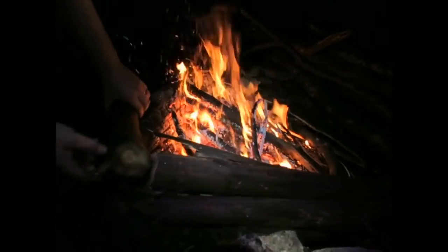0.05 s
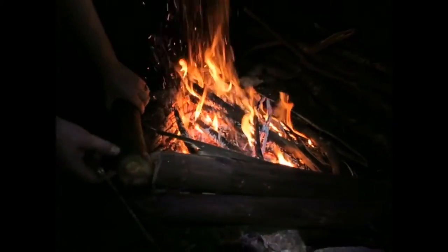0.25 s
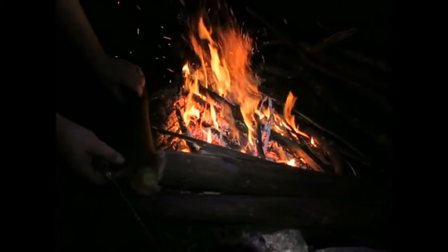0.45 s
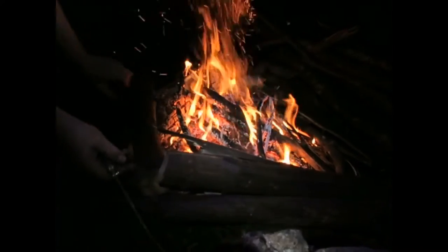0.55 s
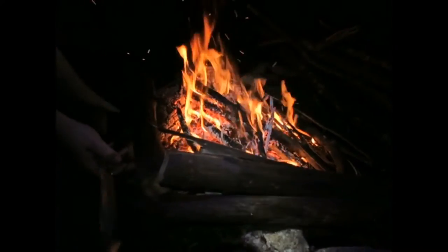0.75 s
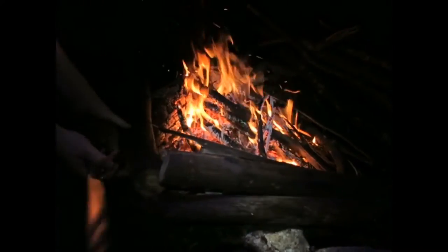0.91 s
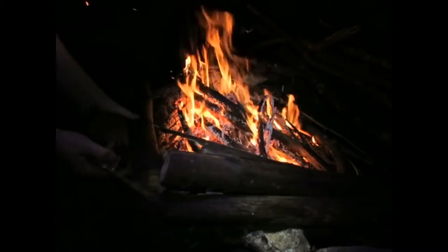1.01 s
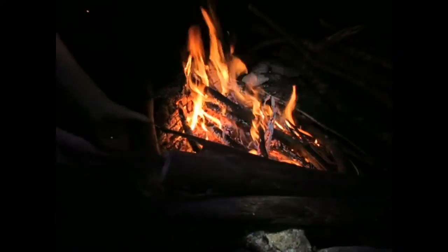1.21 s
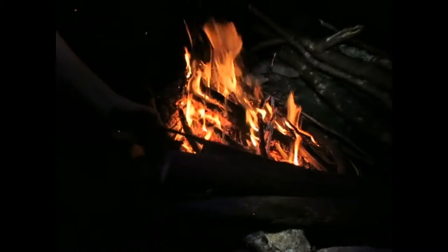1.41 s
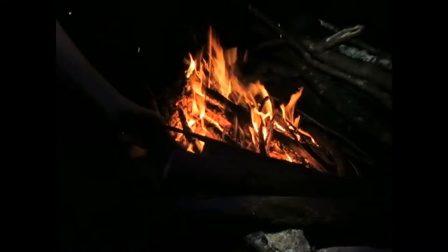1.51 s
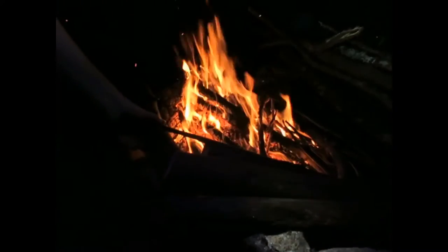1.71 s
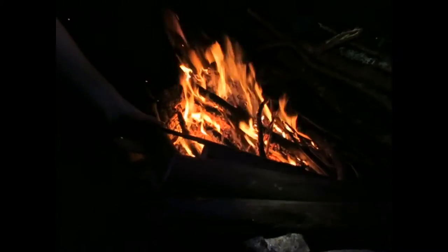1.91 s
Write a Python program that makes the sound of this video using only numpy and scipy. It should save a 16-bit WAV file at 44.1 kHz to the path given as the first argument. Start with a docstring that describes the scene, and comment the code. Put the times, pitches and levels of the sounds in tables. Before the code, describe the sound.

A wood fire crackles close by outdoors, about two seconds. Low flames flutter under sputtering sap hiss and fine ember fizz. Sharp snaps at 0.02 and 0.12, a hollow log knock at 0.2, then an overloaded, thumping crack at 0.4. Bright snaps follow at 0.63 and 0.74, faint ticks around 1.0, a pop at 1.25, and wood thuds dully on the ground at 1.65 as the flutter swells.

```python
"""Wood fire, close microphone

A wood fire outdoors at night: filtered noise makes the low flutter of the flames, the swelling hiss of
sap and the fizz of embers under fine crackle. Close by, the fire snaps in bursts of coloured noise with
a scattered answer. Ringing modes make knocks on a hollow log and low thuds: the thump of the loudest
snap and wood landing on the ground.
"""
import sys
import numpy as np
from scipy import signal
from scipy.fft import rfft, irfft, next_fast_len
from scipy.io import wavfile
from scipy.ndimage import uniform_filter1d, map_coordinates

SR = 44100
rng = np.random.default_rng(int(sys.argv[2]) if len(sys.argv) > 2 else 0)


def dump(signal):
    """Clip the signal to [-1, 1] and save it as 16-bit WAV at the path in sys.argv[1]."""
    limited = np.clip(np.atleast_2d(signal).T, -1, 1)
    pcm = np.round(limited * 32767).astype(np.int16)
    wavfile.write(sys.argv[1], SR, pcm)


N = 85995

# Levels of the three steady sounds: (time [s], sap hiss [dB], flame flutter [dB], ember fizz [dB])
BED_LEVELS = [(0, -48.5, -37.5, -46), (.14, -44, -45.5, -49.5), (.27, -49, -43, -54),
              (0.358, -66.5, -49.5, -51.5), (.5, -48.5, -47, -55), (.56, -47, -44.5, -56),
              (.86, -48.5, -47, -57), (.95, -56, -48.5, -59), (1.09, -72.5, -49.5, -60),
              (1.22, -48.5, -47, -55), (1.45, -52, -42.5, -54), (1.58, -53, -40.5, -54),
              (1.72, -61, -44.5, -56), (1.95, -52.5, -41.5, -59)]
# Spectrum of the flame flutter: (frequency [Hz], relative density [dB per Hz])
FLAME_SPECTRUM = [(20, -8.5), (55, -0.5), (130, 0), (220, -6), (450, -14), (900, -21.5), (2500, -43)]
# Resonances of the narrow sap vents: (frequency [Hz], width [Hz], level [dB])
SAP_VENTS = [(980, 118, -5.5), (1510, 136, 0.95), (1903, 130, -1.5), (2860, 980, -13.5)]
# Spectrum of the ember fizz: (frequency [Hz], relative density [dB per Hz])
FIZZ_SPECTRUM = [(300, -1.5), (700, -7), (3000, -7.5), (7000, -15.5), (12300, -17.5), (13200, -15.5),
                 (16000, -49)]
# Stereo likeness of the steady sounds: (frequency [Hz], left-right correlation [0 to 1])
STEREO_LIKENESS = [(100, 1), (450, 0.23), (800, 0.42), (1800, 0.93), (5000, 0.62), (12000, 0.2)]
# Snaps of the fire, some with a quick ground echo, and the clack that starts a thud:
# (time [s], peak level [dB], pitch [Hz], bass [dB], treble [dB], width [share of pitch])
SNAP_EVENTS = [(0.0188, -11.5, 3360, -13, -4, 0.83), (0.0298, -29, 5000, -18, -5, .9),
               (0.1184, -11.5, 3300, -2.5, -10.5, 5.1), (.169, -33, 5340, -16, -25, 0.38),
               (0.199, -28.5, 5000, -22, -33, 0.65), (0.3279, -17.5, 3980, -20, 1.5, 3.3),
               (.3959, 8, 2050, -9, -22, .8), (.3972, -4, 3100, -12, -30, 0.3),
               (0.3981, 5, 2250, -14, -30, 0.5), (0.5307, -29, 3320, -2, -25, 0.37),
               (0.6305, -9, 4940, -14.5, 3.5, 1.02), (0.7411, -12, 2900, -8, -30, 0.7),
               (0.7427, -1.5, 4500, -21, -40, .55), (.7444, -15, 4500, -18, -40, .5),
               (0.9526, -33.5, 4360, -50, -24, 0.71), (1.0152, -29, 8000, -26.5, 0.5, .8),
               (1.0306, -20, 3700, -9.5, -27, 2.8), (1.056, -33.5, 7240, -33.5, -1, 0.15),
               (1.0958, -28.5, 6000, -27, 11, 0.82), (1.1623, -33, 6970, -25, 16, 1),
               (1.176, -35, 7000, -20, -5, 0.99), (1.2465, -12, 3150, -11.5, -7.5, 0.87),
               (1.2495, -22, 6000, -20, 0, 1.4), (1.3493, -24, 2700, -8, -22, 0.4),
               (1.3519, -31, 1700, -12, -25, .35), (1.3587, -21.5, 4080, -5, -3, 1.5),
               (1.375, -31.5, 8100, -32, 10, 0.71), (1.4505, -31, 4930, -28, -16, 0.56),
               (1.5381, -29, 6000, -22, -14, 0.78), (1.606, -37.5, 4240, -28, -14, 0.63),
               (1.647, -21, 1200, -6, -45, 1.5), (1.679, -17.5, 3300, -9.5, -9.5, 0.69),
               (1.7931, -24, 4080, -35.5, -11, 2), (1.803, -30.5, 2970, -13, -16, 0.32)]
# Blows on the hollow log: (time [s], level [dB], ring [share of the modes' t60])
LOG_KNOCKS = [(.1985, -20.5, 1.11), (.2043, -24, 1.02), (.553, -36.5, 0.76), (.561, -40.5, 0.65)]
# Modes of the hollow log: (frequency [Hz], level [dB], t60 at ring share 1 [s])
LOG_MODES = [(285.8, -1.7, 0.17), (299.3, -9.5, 0.14), (443, 0.3, 0.085), (595, -3.5, 0.084),
             (745, -5.5, 0.051), (1035, -12, 0.062)]
# Low thuds, the thump of the loudest snap and wood landing on the ground:
# (time [s], level [dB], ring [share of the modes' t60])
LOW_THUDS = [(.3963, -19, .25), (1.6478, -26, 1), (1.6605, -33, 1)]
# Modes shared by the low thuds: (frequency [Hz], level [dB], t60 at ring share 1 [s])
THUD_MODES = [(61, -15, 0.13), (101, 2.5, 0.052), (148.3, 5.5, 0.057), (242.6, -3.5, 0.14),
              (329, -1.5, 0.084), (457.4, -7.5, 0.1), (763, -7.5, 0.09), (1042, -5, 0.075),
              (1220, -24, 0.043)]
# Response of the microphone: (frequency [Hz], gain [dB])
MIC_RESPONSE = [(25, -6), (60, 0), (9000, -0.5), (16300, -7.5)]

CRACKLE_PER_S, CRACKLE_DB = 700, -8.5  # level relative to the ember hiss
CRACKLE_HZ, CRACKLE_CYCLES = 6000, 3.58  # middle pitch; cycles until a tick falls to 1/e
CRACKLE_SPREAD_DB = 3.5  # mean of the exponential spread of tick levels
SPLINTER_DB, SPLINTER_T60_S, TREBLE_T60_S = -20, 0.014, 0.011  # tearing after the burst
SCATTER_DB, SCATTER_T60_S, SCATTER_WAIT_S = -41.5, 0.08, 0.0011  # answer of logs and ground
BASS_HZ, BASS_Q, TREBLE_HZ, TREBLE_Q = 700, 0.6, 12500, 5  # outer colours of a snap
LEFT_DB, LEFT_LAG_S = -0.06, 14e-6  # the snaps sit a little to the right
GRIT_DB, GRIT_HZ, GRIT_T60_S = 14.5, 700, 0.06  # rough part of a thud; t60 at ring share 1
CLIP_TOP, CLIP_KNEE, TOP_HZ = 1.0, 6, 16300  # full scale, knee exponent, band limit


def amp(db):
    """Decibels to gain."""
    return 10 ** (np.asarray(db) / 20)


def unit(x):
    """Scaled to rms 1."""
    return x / np.sqrt(np.mean(x ** 2) + 1e-20)


def along(points, hz):
    """Value at hz, read between (Hz, value) points on a log axis."""
    f, v = np.transpose(points)
    return np.interp(np.log(hz + 1), np.log(f + 1), v)


def level_curve(column):
    """One column of the steady levels in dB, a value per sample."""
    rows = np.array(BED_LEVELS)
    return np.interp(np.arange(N) / SR, rows[:, 0], rows[:, column])


def wobble(rate):
    """A smooth random curve with rate knots a second (below 100)."""
    knots = rng.standard_normal(int(N * 100 / SR) + 4)
    return map_coordinates(knots, [np.arange(N) * rate / SR])


def filtered(x, response):
    """x times a complex response of frequency, with padding for the tails."""
    n = x.shape[-1]
    m = next_fast_len(n + 4096)
    return irfft(rfft(x, m) * response(np.fft.rfftfreq(m, 1 / SR)), m)[..., :n]


def peak(f, hz, width):
    """One causal resonance with gain 1 at its centre."""
    return 1j * f * width / (hz * hz - f * f + 1j * f * width)


def rush(gain, patchy_db):
    """Stereo noise of rms 1, its gain varying in patches of time and frequency."""
    z = signal.stft(rng.standard_normal((2, N)), nperseg=512)[2]
    field = rng.standard_normal(z.shape[1:])
    field = uniform_filter1d(field, size=6, axis=0)
    field = uniform_filter1d(field, size=8, axis=1)
    pair = signal.istft(z * amp(patchy_db * unit(field)), nperseg=512)[1][:, :N]

    def mid_side(hz):
        # cos(2 * angle) is the correlation of left and right
        angle = np.arccos(np.clip(along(STEREO_LIKENESS, hz), -1, 1)) / 2
        return gain(hz) * np.array([np.cos(angle), np.sin(angle)])

    mid, side = filtered(pair, mid_side)
    return unit(np.array([mid + side, mid - side]))


def add(track, s, x):
    """Mixes x in at time s, cut at the end of the track."""
    part = track[..., round(s * SR):][..., :x.shape[-1]]
    part += x[..., :part.shape[-1]]


def flames():
    """Low flutter of the burning gas: noise weighted to the bass with a wavering level."""
    level_db = level_curve(column=2) + 1.8 * wobble(rate=25)
    return amp(level_db) * rush(lambda f: amp(along(FLAME_SPECTRUM, f)), patchy_db=2.3)


def sap():
    """A sputtering hiss: noise through the resonances of narrow vents."""
    def vents(f):
        total = 0
        for k, (hz, width, db) in enumerate(SAP_VENTS):
            total = total + (-1) ** k * amp(db) * peak(f, hz, width)  # neighbours in opposite sign
        return total * peak(f, 1300, 2700)

    level_db = level_curve(column=1) + 2.08 * wobble(rate=44.87)
    return amp(level_db) * rush(vents, patchy_db=2.46)


def crackle():
    """Many tiny decaying sine ticks, a few of them spiky, leaning right by up to 20 dB; rms 1."""
    u = rng.random((round(CRACKLE_PER_S * N / SR), 4))  # time, pitch, level, side
    hz = np.clip(CRACKLE_HZ * np.exp(2.2 * (u[:, 1:2] - 0.5)), 500, 15000)
    t = np.arange(160) / SR
    strength = amp(-CRACKLE_SPREAD_DB * np.log(1 - u[:, 2:3]))
    tick = strength * np.sin(2 * np.pi * hz * t) * np.exp(-t * hz / CRACKLE_CYCLES)
    start = (u[:, :1] * (N - len(t))).astype(int)
    at = (start + np.arange(len(t))).ravel()
    lean_db = 10 * (u[:, 3:] - 1)
    sides = [np.bincount(at, (tick * amp(side * lean_db)).ravel(), N) for side in (1, -1)]
    return unit(np.array(sides))


def fizz():
    """Broad noise hiss of the embers with fine crackle on it."""
    hiss = rush(lambda f: amp(along(FIZZ_SPECTRUM, f)), patchy_db=3.0)
    level_db = level_curve(column=3) + 0.6 * wobble(rate=11)
    return amp(level_db) * (hiss + amp(CRACKLE_DB) * crackle())


def snaps():
    """A burst, a short tearing and a scattered answer, in each event's own colour; treble tears shortest."""
    out, t = np.zeros((2, N)), np.arange(SR // 8) / SR
    burst = -1.0 * (t == 0)
    scatter = amp(SCATTER_DB - 60 * t / SCATTER_T60_S) * (1 - np.exp(-t / SCATTER_WAIT_S))
    for s, db, hz, bass_db, treble_db, share in SNAP_EVENTS:
        noise = rng.standard_normal((3, len(t)))
        answer = scatter * noise[1:]  # different left and right
        body = burst + amp(SPLINTER_DB - 60 * t / SPLINTER_T60_S) * noise[0]
        edge = burst + amp(SPLINTER_DB - 60 * t / TREBLE_T60_S) * noise[0]

        def body_colour(f):
            pitch = peak(f, hz, hz * share) * peak(f, hz, 2 * hz) ** 2
            bass = 2 * peak(f, BASS_HZ, BASS_HZ / BASS_Q) / (1 + 1j * f / 2500)
            return pitch + amp(bass_db) * bass

        def edge_colour(f):
            return amp(treble_db) * peak(f, TREBLE_HZ, TREBLE_HZ / TREBLE_Q)

        pair = filtered(body + answer, body_colour) - filtered(edge + answer, edge_colour)
        add(out, s, amp(db) * pair / np.abs(pair).max())

    def placing(f):
        left = amp(LEFT_DB) * np.exp(-2j * np.pi * f * LEFT_LAG_S)
        return np.array([left, np.ones_like(f)])

    return filtered(out, placing)


def struck(blows, modes, attack_s):
    """Decaying sine modes, rung by every blow with slightly new strengths."""
    out, t = np.zeros(N), np.arange(SR // 4) / SR
    for s, db, share in blows:
        ring = np.zeros(len(t))
        for hz, level, t60 in modes:
            decay = amp(level + 2 * rng.normal() - 60 * t / (t60 * share))
            ring += decay * np.sin(2 * np.pi * hz * t)
        add(out, s, amp(db) * ring * (1 - np.exp(-t / attack_s)))
    return out


def knocks():
    """The hollow log rings in its own modes when knocked."""
    return struck(LOG_KNOCKS, LOG_MODES, attack_s=0.00079)


def thuds():
    """The loudest snap's thump and wood landing on the ground: low modes with a rough, dull noise burst."""
    out, t = struck(LOW_THUDS, THUD_MODES, attack_s=0.00026), np.arange(SR // 8) / SR
    for s, db, share in LOW_THUDS:
        grit = filtered(rng.standard_normal(len(t)), lambda f: peak(f, GRIT_HZ, GRIT_HZ) ** 2)
        add(out, s, amp(db + GRIT_DB - 60 * t / (GRIT_T60_S * share)) * grit)
    return out


def scene():
    """The whole fire in stereo, knocks and thuds in the centre."""
    return flames() + sap() + fizz() + snaps() + knocks() + thuds()


def record(dry):
    """The microphone thins deep bass and dulls the top, the loudest snap clips, then the band is limited."""
    x = filtered(dry, lambda hz: amp(along(MIC_RESPONSE, hz)))
    clipped = x / (1 + np.abs(x / CLIP_TOP) ** CLIP_KNEE) ** (1 / CLIP_KNEE)
    return filtered(clipped, lambda hz: hz < TOP_HZ)


dry = scene()
out = record(dry)
dump(out)
```